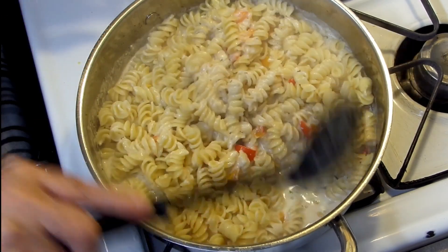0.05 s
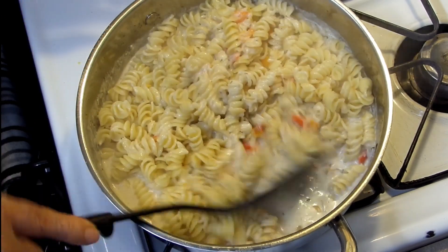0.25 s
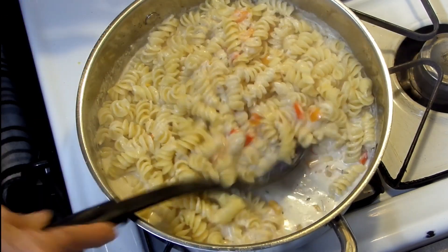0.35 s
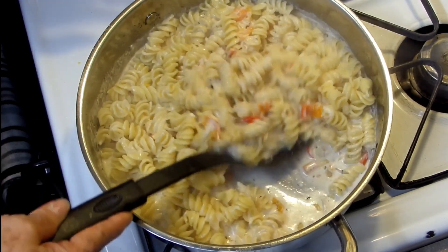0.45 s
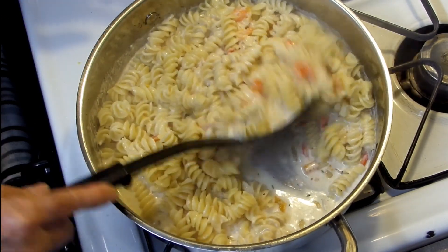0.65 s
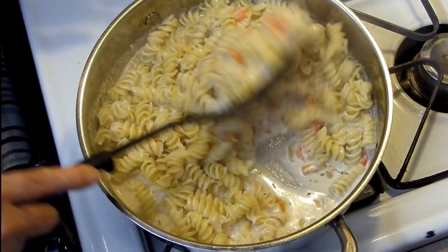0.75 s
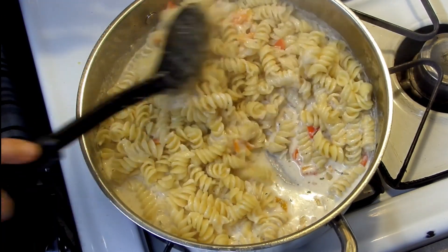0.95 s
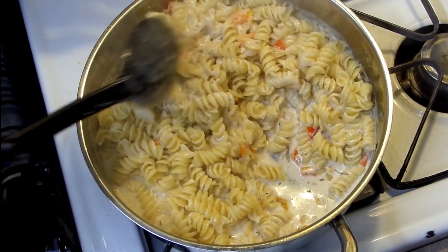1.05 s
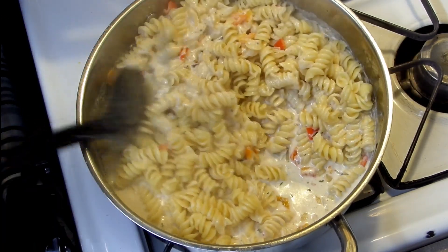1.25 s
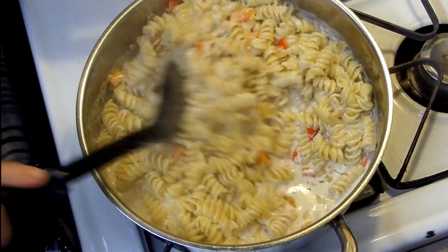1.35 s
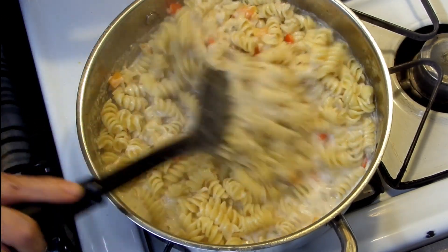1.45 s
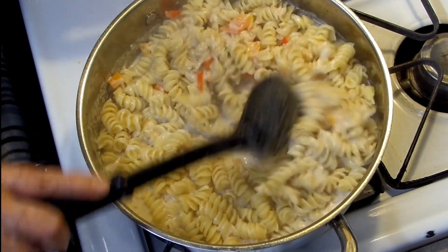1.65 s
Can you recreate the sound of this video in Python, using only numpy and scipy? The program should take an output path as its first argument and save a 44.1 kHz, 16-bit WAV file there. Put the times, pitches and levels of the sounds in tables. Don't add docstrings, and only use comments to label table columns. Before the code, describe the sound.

A plastic spoon stirs creamy pasta in a metal skillet, knocking the pan amid wet squelches.

```python
import sys
import numpy as np
from scipy import signal
from scipy.io import wavfile

SR = 44100
rng = np.random.default_rng(int(sys.argv[2]) if len(sys.argv) > 2 else 0)


def output_pcm(signal):
    pcm = np.clip(np.atleast_2d(signal).T, -1, 1) * 32767
    wavfile.write(sys.argv[1], SR, np.round(pcm).astype(np.int16))


def convert_level_to_amplitude(level_db):
    exponent = np.asarray(level_db, float) / 20
    return 10 ** exponent


N = 74970
T = np.arange(N) / SR
BAND_EDGES_HZ = 20 * 2 ** np.arange(0, 9.9, .4)

# start_s, level_db, contact_s, dense_ring_db, ring_length_factor
KNOCKS = [
    (0.192, -17, 0.0012, -12.5, 1),
    (.2413, -4, 0.00086, -5, 0.72),
    (0.4782, -9, 0.0012, -12, 0.78),
    (1.337, -9, 0.00017, -10.5, 0.8),
]
# pitch_hz, level_db, die_away_s (time to fall 60 dB)
TONES_A = [(213, -13, .15), (333, -2.5, 0.19), (693, -3, 0.056), (622, -5.5, .1), (968, -4.5, 0.54),
           (1035, -13, 0.24), (1630, -12, 0.12), (3580, -15, .06), (5770, -12.5, .06), (6370, -4.5, 0.038),
           (7240, -15, .03)]
TONES_B = [(362, -14.5, 0.37), (283.8, -18.5, 0.79), (205.6, -13, 0.16), (637, -13, .25), (516, -12, 0.14),
           (993.6, -7.5, 0.18), (1040, -2.5, 0.14), (1156, -13, 0.13), (1665, -7.5, 0.14), (1773, 3, 0.052),
           (1863, -12, 0.18), (4370, -8.5, .03), (5944, -9.5, 0.086), (6850, -5.5, 0.062)]
TONES_C = [(109.6, -9, 0.14), (190.2, -2, 0.12), (410, -12, 0.12), (644, -3, 0.085), (942, -11.5, .15),
           (1074, -28, 0.24), (1304, 1, 0.054), (1540, 0, 0.041), (1795, -8.5, 0.043)]
TONES_D = [(136, -21, 0.23), (204.6, -11.5, 0.11), (338, -14, 0.12), (700, -3, 0.066), (1078, -2, 0.047),
           (4200, -12, 0.025), (1540, 4, 0.022), (2126, 3, 0.028), (2520, -11.5, 0.043),
           (3190, -6.5, 0.024), (5130, -8, 0.035)]
# pitch_hz, level_db (per Hz)
DENSE_A = [(60, -31), (200, -4.5), (480, -11.5), (950, -8.5), (1400, -12.5), (2900, -29), (6100, -16),
           (15000, -35)]
DENSE_B = [(35, -41.5), (60, -29), (577, -6.5), (1010, 1), (1490, -17.5), (1830, 1), (2420, -9.5),
           (6840, -12), (15000, -43.5)]
DENSE_C = [(35, -52), (60, -6.5), (195, -12), (276, -13.5), (648, -7.5), (1150, -8), (1300, -6),
           (2470, -28), (15000, -30)]
DENSE_D = [(35, -47), (60, -33), (200, -5), (633, -8), (744, -20), (916, 0.5), (1270, 3), (2780, -10),
           (5000, -15), (15000, -44)]
# pitch_hz, die_away_s
DENSE_DIE_AWAY = [(60, 0.55), (300, 0.63), (1000, 0.21), (3000, 0.15), (8000, 0.15), (15000, 0.0083)]
# start_s, level_db, pitch_hz, die_away_s
REBOUNDS = [(0.204, -24, 381, 0.072), (.251, -15.5, 846.6, .12), (.2495, -34, 2000, 0.046),
            (.271, -22, 1008, 0.1), (.447, -39, 675, .04), (0.445, -49, 990, .04), (.514, -30.5, 649, 0.22),
            (1.3445, -24.5, 760, 0.057), (1.3443, -25.5, 1410, 0.06), (1.349, -29.5, 1270, 0.046),
            (1.348, -25, 264, 0.042), (1.365, -46, 214, 0.11), (1.376, -46, 1540, .04)]
# start_s, level_db, centre_hz, die_away_s
CRACKS = [
    (0.1919, -24, 6270, 0.033),
    (0.1913, -29, 12300, 0.067),
    (0.2436, -16, 4200, 0.0084),
    (0.2468, -23, 6500, 0.02),
    (0.477, -24, 5750, 0.048),
    (1.3377, -22, 4740, 0.025),
]
POP_STARTS = [.0900, .1115, .3165, .3405, .4125, .439, .5905, .6715, .7995, .8843, .9028, .9065, .9293,
              .9645, .9975, 1.013, 1.0278, 1.0513, 1.0568, 1.0742, 1.134, 1.276, 1.2912, 1.3045, 1.433,
              1.4675, 1.505, 1.55, 1.597, 1.647, .3168, .3408, .349, .4128, .421, .003, 1.2985, 1.44, 1.68]
# level_db, pitch_hz, spray_db
POPS = [(-37, 29000, -2), (-30.5, 10000, -20.5), (-28, 7900, -9), (-19.5, 4260, -19), (-29, 3200, -11.5),
        (-30.5, 3600, -11), (-35.5, 7100, -12.5), (-28, 13600, -9.5), (-31.5, 10200, -18),
        (-23, 14600, -29), (-24.5, 11000, -24.5), (-40, 13000, -24), (-36, 16000, -8), (-36, 10000, -12.5),
        (-34.5, 5700, -9.5), (-36, 6500, -10), (-31, 4200, -21), (-39, 11000, -18), (-27, 8800, -16),
        (-35, 12000, -8.5), (-40, 11600, -12), (-47, 4300, -6), (-29, 12500, -14), (-24, 4400, -19.5),
        (-25.5, 6000, -19), (-24.5, 4650, -17), (-28, 8600, -15), (-39, 4400, -16), (-53, 7700, -21),
        (-43, 11000, -10), (-36, 21000, -17), (-27, 8100, -20), (-31, 11000, -14), (-29.5, 6500, -10),
        (-29.5, 6400, -10), (-38, 4200, -16.5), (-33, 5100, -15.5), (-38, 11800, -12), (-35, 11000, -14)]
# start_s, level_db, pitch_hz, die_away_s
PLOPS = [
    (.365, -38, 3200, 0.036),
    (0.449, -33, 1400, 0.013),
    (0.679, -40, 1420, 0.042),
    (1.0337, -36.5, 1670, 0.037),
    (1.3056, -46, 1550, 0.014),
    (1.4676, -40, 2100, 0.044),
]
# start_s, fizz_db, churn_db
STIR = [(0, -52.5, -50), (0.049, -62.5, -55.5), (.18, -106, -56), (0.269, -43.5, -31), (.345, -40.5, -41.5),
        (0.404, -50, -42), (0.417, -40, -59), (.46, -48, -44.5), (.56, -51.5, -51.5), (0.692, -51.5, -44.5),
        (0.853, -67.5, -61.5), (1.041, -46, -49), (1.1, -63.5, -50.5), (1.275, -70, -66),
        (1.295, -43.5, -53), (1.36, -47.5, -53), (1.43, -38.5, -41), (1.7, -48, -51)]
# pitch_hz, level_db
FIZZ_COLOUR = [(880, -4), (1500, -3.5), (1740, -4), (3640, -14), (4660, -7), (9940, -11.5), (13900, -7),
               (15800, -4)]
# pitch_hz, level_db
CHURN_COLOUR = [(29, -41), (50, -18.5), (106, -3.5), (147, -9), (397, -12), (440, -11.5), (1320, -22.5),
                (3000, -27), (3900, -20.5), (6600, -120)]
# pitch_hz, level_db
AIR_COLOUR = [(12, -36), (20, 11), (123, -8), (158, -67), (192, 3.5), (308, 0), (5620, -16.5), (9300, -13),
              (15800, -17)]
# pitch_hz, level_db
HUM = [(118, -64.5)]
# start_s, end_s, above_hz, level_db
TREBLE_DIPS = [
    (.178, .188, 1800, -30),
    (.224, .237, 7500, -25),
    (.26, .27, 10500, -12),
    (.47, .477, 8000, -10),
    (.491, .5, 9500, -12),
    (1.322, 1.334, 8000, -10),
    (1.351, 1.362, 9000, -14),
]


def rms_one(x):
    return x / np.sqrt(np.mean(x ** 2) + 1e-20)


def at_hz(points, hz):
    table_hz, value = np.array(points).T[:2]
    return np.interp(np.log(hz), np.log(table_hz), value)


def place(out, start_s, sound):
    start = int(start_s * SR)
    out[start:start + len(sound)] += sound


def drift(rate_hz):
    r = np.exp(-80 * np.pi * rate_hz / SR)
    slow = signal.lfilter([1], [1, -2 * r, r * r], rng.standard_normal(N // 40 + 2002))
    slow = rms_one(slow[2000:])
    return np.interp(np.arange(N) / 40, np.arange(len(slow)), slow)


def bands(white, spectrum):
    for k, (low, high) in enumerate(zip(BAND_EDGES_HZ, BAND_EDGES_HZ[1:])):
        hz = np.sqrt(low * high)
        band_pass = signal.butter(2, [low, high], "band", fs=SR, output="sos")
        yield hz, convert_level_to_amplitude(at_hz(spectrum, hz)) * signal.sosfilt(band_pass, white[k % 2])


def patchy(white, spectrum, patchy_db):
    together = drift(30)
    total = np.zeros(N)
    for _, band in bands(white, spectrum):
        total += band * convert_level_to_amplitude(patchy_db * (1.1 * together + drift(5.0)))
    return rms_one(total)


def struck(t, hz, die_away_s, rise_s):
    shape = (1 - np.exp(-t / rise_s)) ** 2 * convert_level_to_amplitude(-60 * t / die_away_s)
    return shape / shape.max() * np.sin(2 * np.pi * (hz * t + rng.random()))


def dense_ring(t, colour, contact_s, longer):
    parts = list(bands(rng.standard_normal((2, len(t))), colour))
    dense = np.zeros(len(t))
    for hz, band in parts:
        rise = 1 - np.exp(-t / (contact_s + 1 / hz))
        dense += band * rise * convert_level_to_amplitude(-60 * t / (longer * at_hz(DENSE_DIE_AWAY, hz)))
    return dense / np.std(sum(band for _, band in parts))


def knocks():
    out, t = np.zeros(N + SR), T[:SR // 2]
    spots = (TONES_A, TONES_B, TONES_C, TONES_D)
    colours = (DENSE_A, DENSE_B, DENSE_C, DENSE_D)
    for (start_s, db, contact_s, ring_db, longer), tones, colour in zip(KNOCKS, spots, colours):
        hit = convert_level_to_amplitude(ring_db) * dense_ring(t, colour, contact_s, longer)
        for hz, level_db, die_away_s in tones:
            hit += convert_level_to_amplitude(level_db - 10) * struck(t, hz, die_away_s, contact_s + .6 / hz)
        place(out, start_s, convert_level_to_amplitude(db) * hit)
    for start_s, db, hz, die_away_s in REBOUNDS:
        place(out, start_s, convert_level_to_amplitude(db) * struck(t, hz, die_away_s, rise_s=0.00095))
    return signal.sosfilt(signal.butter(4, 80, "high", fs=SR, output="sos"), out[:N])


def cracks():
    out, size = np.zeros(N + SR), SR // 10
    octaves = np.array([-.4, .4])
    for start_s, db, hz, die_away_s in CRACKS:
        edges = np.minimum(hz * 2 ** octaves, 17000)
        band_pass = signal.butter(1, edges, "band", fs=SR, output="sos")
        burst = rms_one(signal.sosfilt(band_pass, rng.standard_normal(size)))
        place(out, start_s, convert_level_to_amplitude(db - 6) * burst * convert_level_to_amplitude(-60 * T[:size] / die_away_s))
    return out[:N]


def ring(clicks, hz, die_away_s):
    r = convert_level_to_amplitude(-60 / (die_away_s * SR))
    w = 2 * np.pi * min(hz, 16000) / SR
    return signal.lfilter([0, np.sin(w)], [1, -2 * r * np.cos(w), r * r], clicks + 1e-18)


def pops():
    out, size = np.zeros(N + SR), SR // 10
    click, t = np.eye(1, size)[0], T[:size]
    for start_s, (db, hz, spray_db) in zip(POP_STARTS, POPS):
        spray = convert_level_to_amplitude(spray_db) * rng.standard_normal(size) * convert_level_to_amplitude(-60 * t / 0.032)
        thin = signal.lfilter(*signal.butter(2, .7 * hz, "high", fs=SR), click + spray)
        place(out, start_s, convert_level_to_amplitude(db) * ring(thin, hz, 9 / hz))
    for start_s, db, hz, die_away_s in PLOPS:
        spray = 0.21 * rng.standard_normal(size) * convert_level_to_amplitude(-60 * t / die_away_s)
        place(out, start_s, convert_level_to_amplitude(db) * ring(click + spray, hz, .2 * die_away_s))
    return out[:N]


def sauce():
    start_s, fizz_db, churn_db = np.transpose(STIR)
    fizz_per_s, spread_db = 6000, 3.5
    sizes = convert_level_to_amplitude(spread_db * np.minimum(rng.exponential(1, (2, N)), 5)) * rng.choice([-1, 1], (2, N))
    grains = sizes * (rng.random((2, N)) < fizz_per_s / SR)
    fizz = patchy(grains, [(300, -45)] + list(FIZZ_COLOUR), patchy_db=.7)
    churn = patchy(rng.standard_normal((2, N)), list(CHURN_COLOUR) + [(6000, -50)], patchy_db=1.5)
    fizz_level = convert_level_to_amplitude(np.interp(T, start_s, fizz_db) - 1.5)
    churn_level = convert_level_to_amplitude(np.interp(T, start_s, churn_db) - 4)
    return fizz_level * fizz + churn_level * churn


def kitchen(x):
    die_away_s, gap_s, level_db = 0.55, 0.004, -20
    t = T[:SR]
    tail = rng.standard_normal(len(t)) * convert_level_to_amplitude(-60 * t / die_away_s) * np.clip(t / gap_s - 1, 0, 1)
    tail = signal.lfilter(*signal.butter(1, 21000, fs=SR), tail)
    return convert_level_to_amplitude(level_db) * signal.fftconvolve(x, tail / np.linalg.norm(tail))[:N]


def background():
    air = convert_level_to_amplitude(-56.5) * patchy(rng.standard_normal((2, N)), AIR_COLOUR, patchy_db=-1.0)
    hum = sum(convert_level_to_amplitude(db + 1.5 + 1.3 * drift(4.3)) * np.sin(2 * np.pi * hz * T) for hz, db in HUM)
    return air + hum


def scene():
    hits = knocks() + cracks() + pops()
    return (hits + kitchen(hits) + sauce() + background())[None]


def dip_treble(x):
    edge_s = .002
    for start_s, end_s, hz, db in TREBLE_DIPS:
        treble = signal.sosfiltfilt(signal.butter(6, hz, "high", fs=SR, output="sos"), x)
        window = np.clip(np.minimum(T - start_s, end_s - T) / edge_s + .5, 0, 1)
        x = x - (1 - convert_level_to_amplitude(db)) * treble * window
    return x


def low_pass(x):
    return signal.sosfilt(signal.butter(12, 16990, fs=SR, output="sos"), x)


def record(dry):
    x = dip_treble(np.tanh(dry))
    x = signal.sosfilt(signal.cheby2(12, 28, 15900, fs=SR, output="sos"), x)
    return low_pass(x)


dry = scene()
out = record(dry)
output_pcm(out)
```